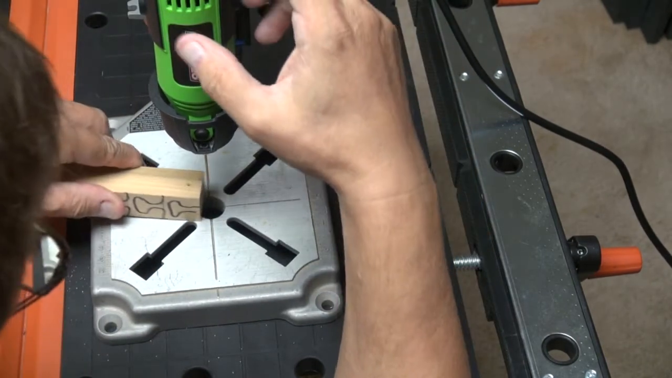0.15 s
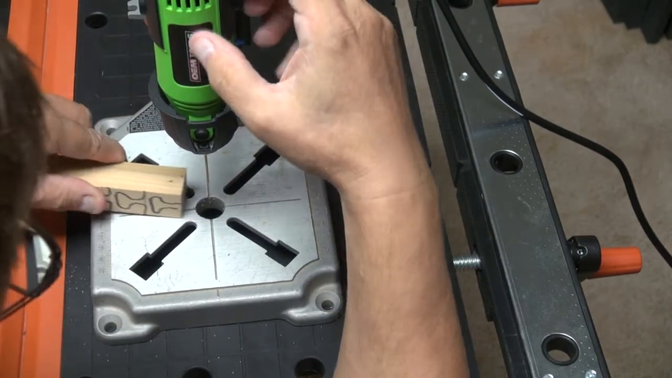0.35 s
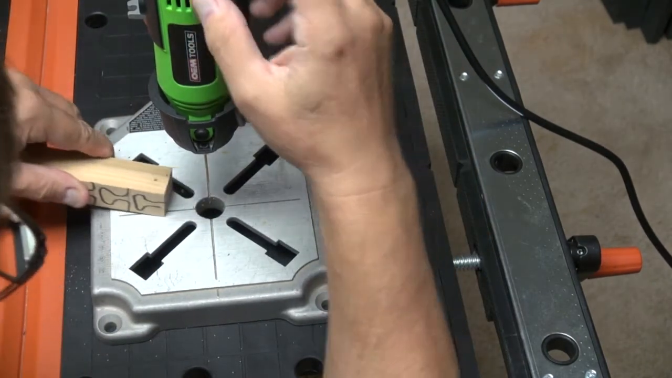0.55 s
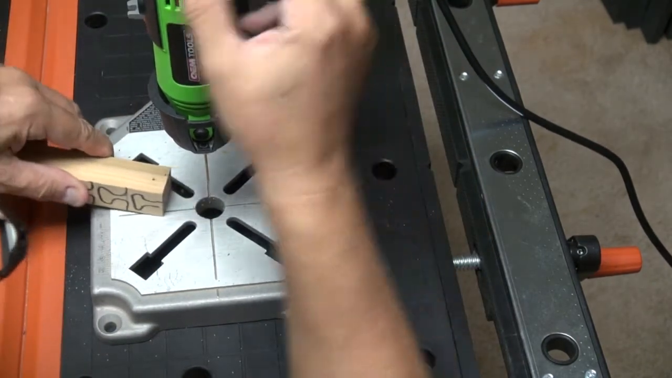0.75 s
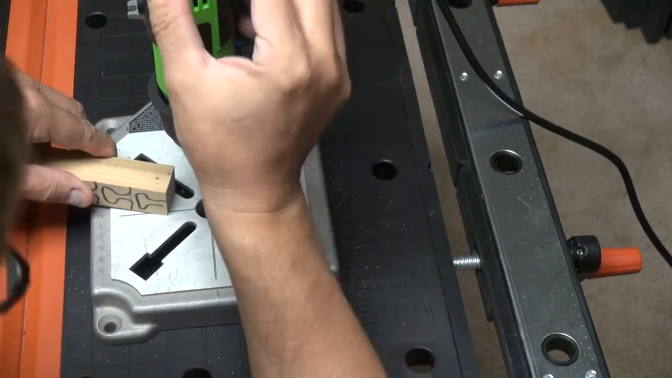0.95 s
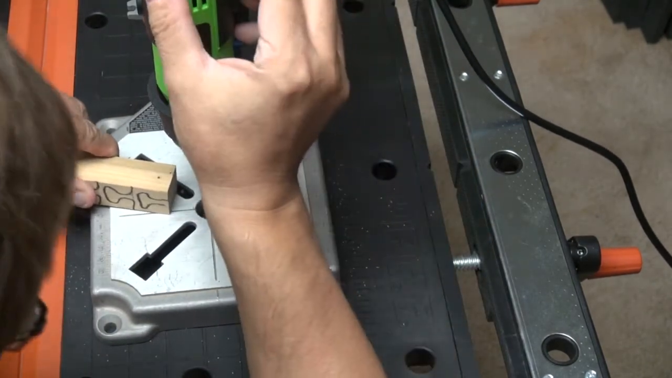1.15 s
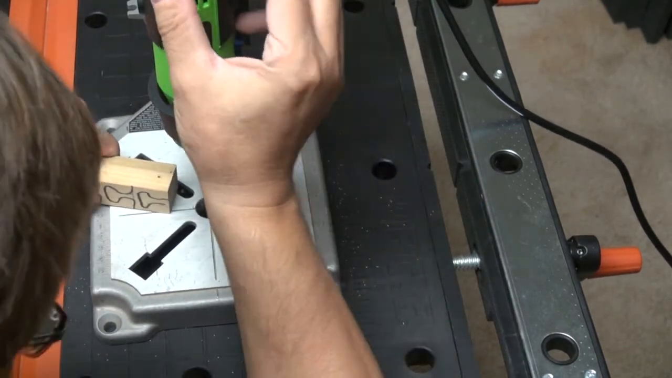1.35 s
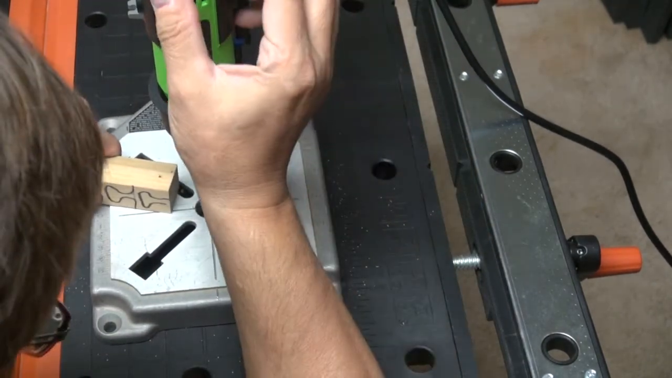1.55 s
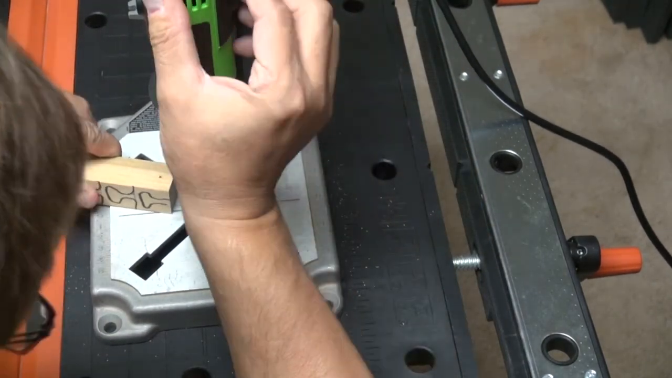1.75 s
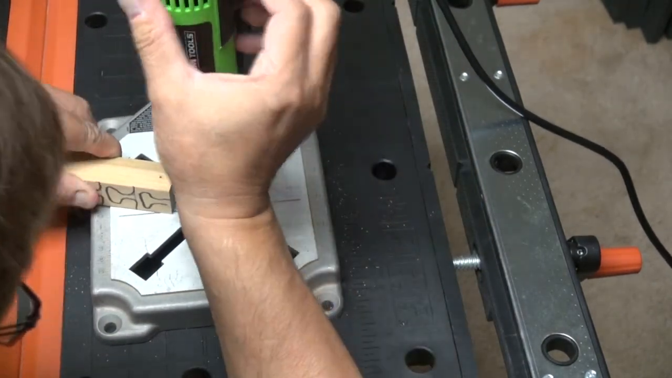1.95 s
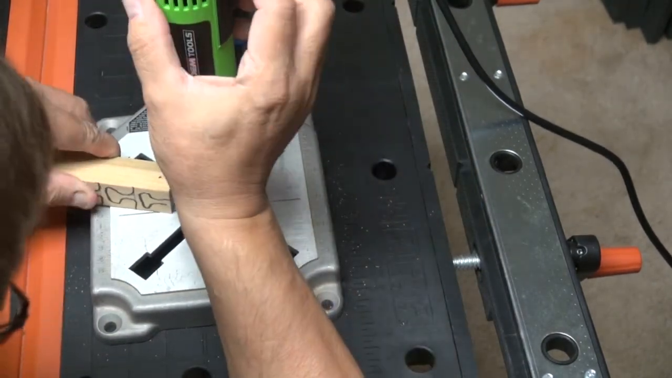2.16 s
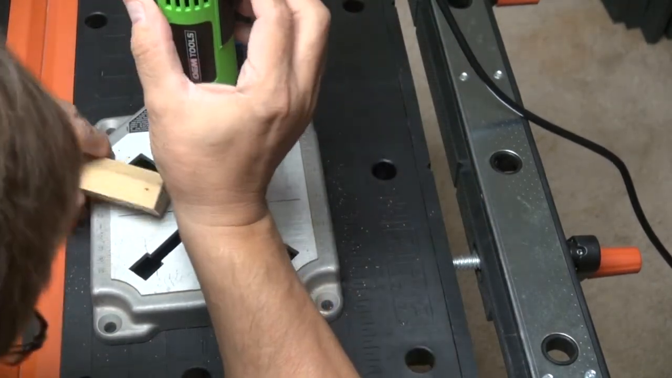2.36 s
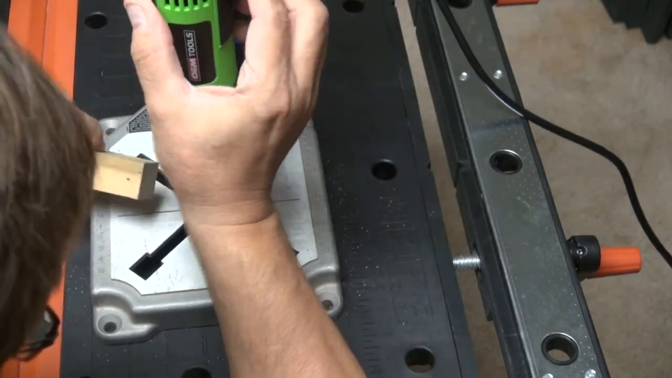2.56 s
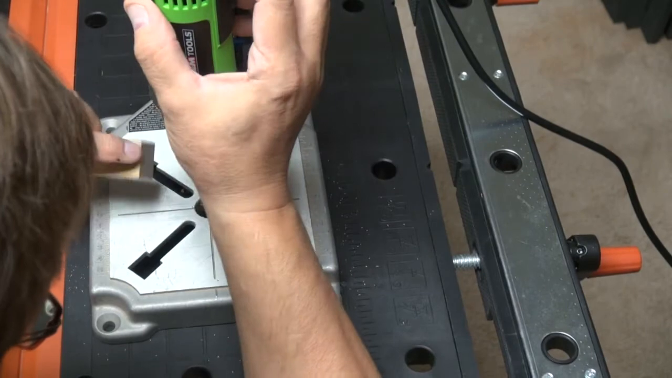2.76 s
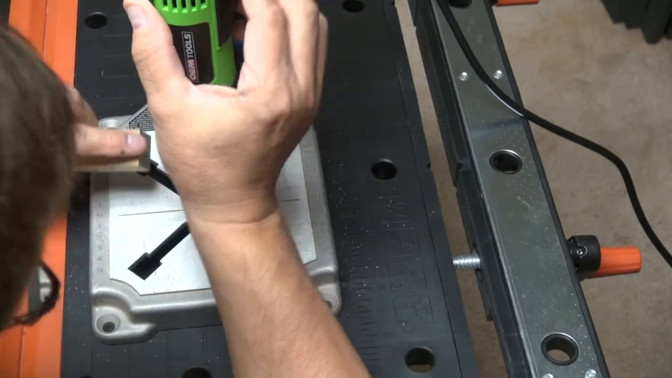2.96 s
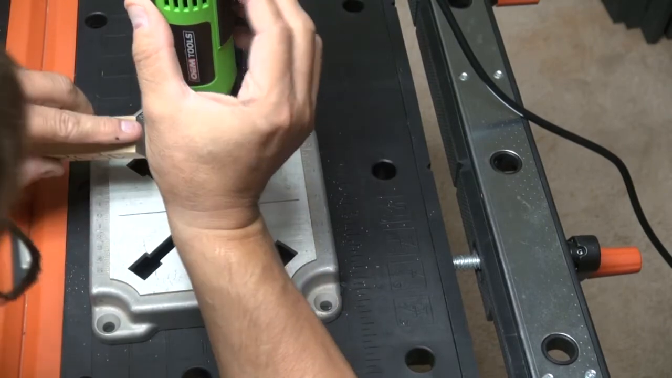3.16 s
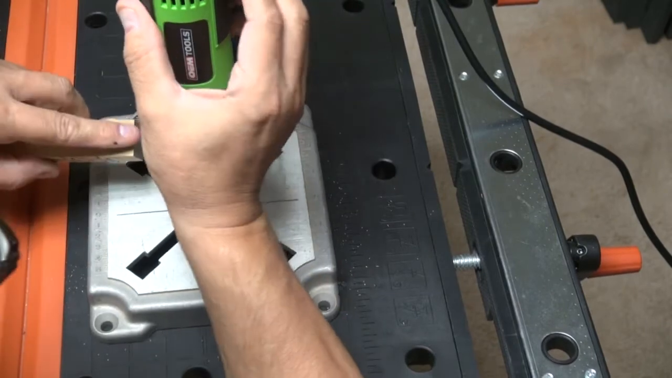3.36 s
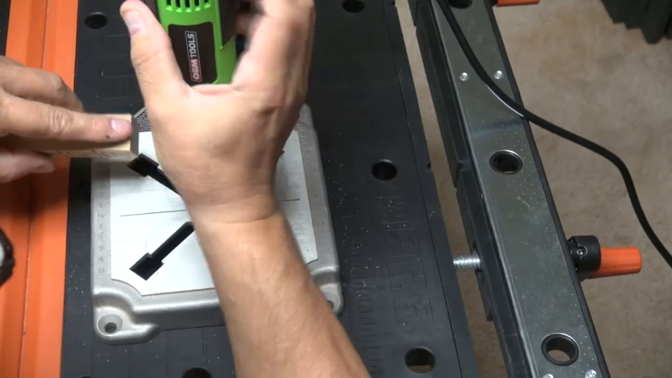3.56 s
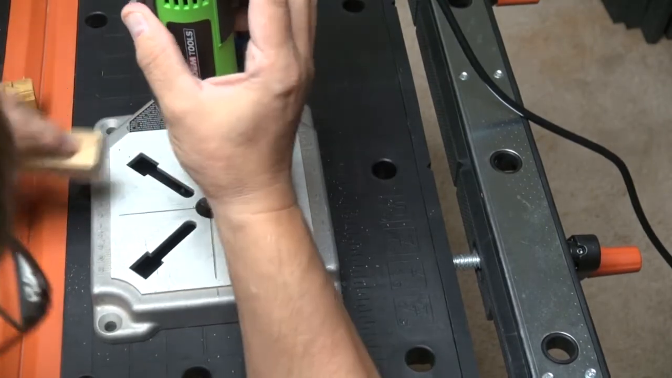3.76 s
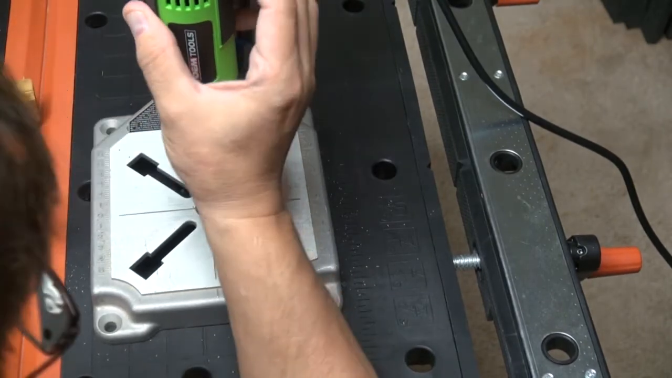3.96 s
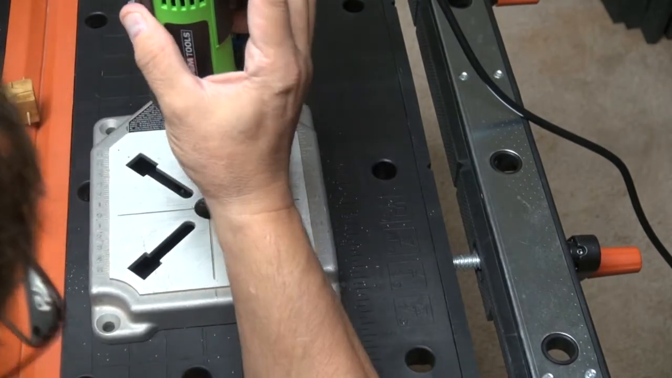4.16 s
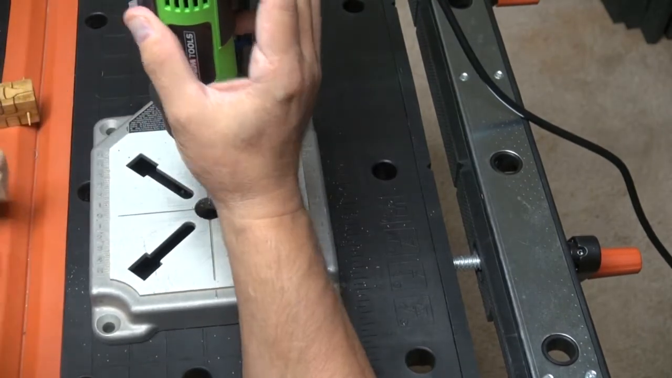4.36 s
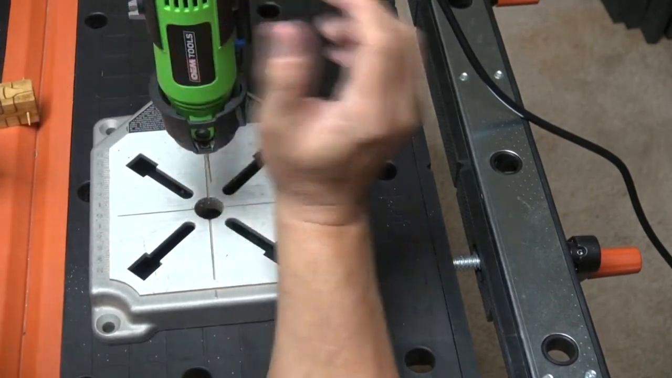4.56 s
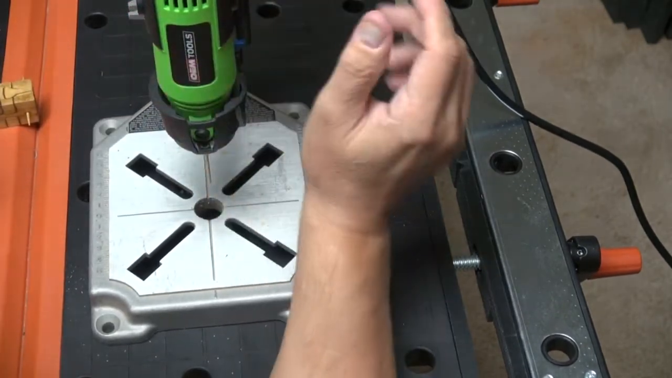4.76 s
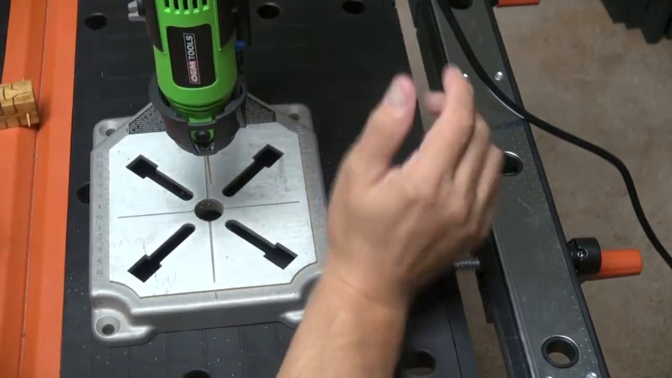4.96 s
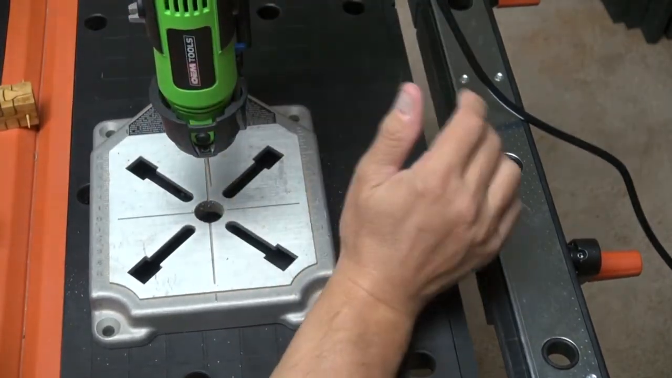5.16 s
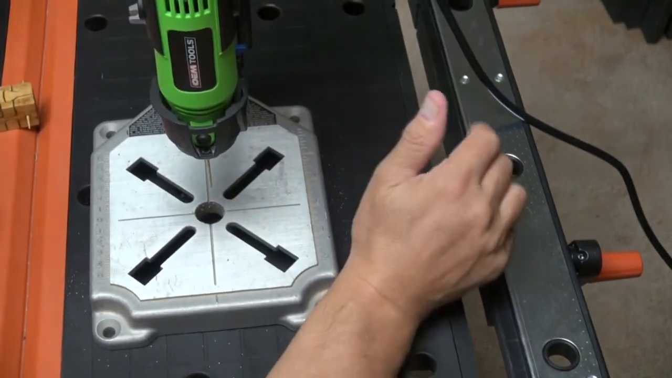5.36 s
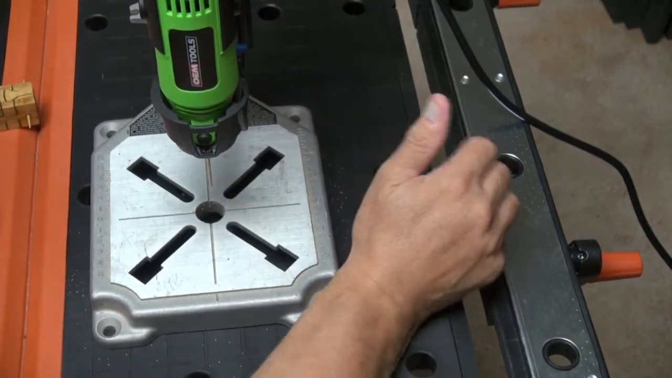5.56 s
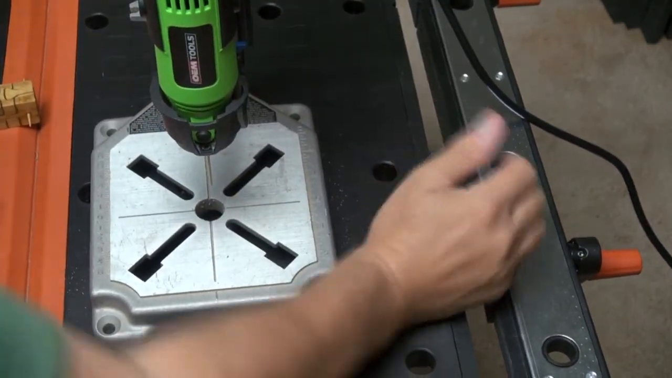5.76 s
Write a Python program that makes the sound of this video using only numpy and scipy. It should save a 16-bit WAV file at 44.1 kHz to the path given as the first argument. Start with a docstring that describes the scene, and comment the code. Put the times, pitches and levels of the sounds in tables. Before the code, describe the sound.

A close stereo pickup, leaning a little left, catches a small electric motor whining at high, nearly constant speed over a wooden block, buzzing and hissing. Power is cut just after four seconds; the pitch falls smoothly as the rotor coasts. Near five seconds come light knocks, then a firmer one and a brief scuff, with a short dry room tail.

```python
"""A small dry workshop: a small rotary tool in a drill stand, close by, a little left of the microphone.
Its shaft whines at about 373 turns a second, sagging a little over a wooden block: partials of one shaft phase.
The motor buzzes with the mains, over hum, fan air and brush hiss; switched off, it coasts in a falling whirr.
Wood knocks on the workbench (ringing modes in a short room tail), and one brief scuff ends the scene."""
import sys
import numpy as np
from scipy import signal
from scipy.fft import rfft, irfft, next_fast_len
from scipy.io import wavfile
from scipy.ndimage import uniform_filter1d, map_coordinates

SR = 44100
rng = np.random.default_rng(int(sys.argv[2]) if len(sys.argv) > 2 else 0)


def file_out(sig):
    """Save sig as 16-bit WAV at sys.argv[1]."""
    # one column per channel
    cols = np.atleast_2d(sig).T
    # limit, then scale
    lim = np.clip(cols, -1, 1)
    pcm = np.round(lim * 32767).astype(np.int16)
    wavfile.write(sys.argv[1], SR, pcm)


N = 256651
OFF_S, MAINS_HZ, TOP_HZ = 4.138, 60, 15750  # switch-off time, mains frequency, top of the band
FULL_SPEED = 373  # reference shaft speed, turns per s


def amp(db):
    """Decibels to gain."""
    return 10 ** (np.asarray(db) / 20)


def unit(x):
    """Scale to rms 1."""
    return x / np.sqrt(np.mean(x ** 2) + 1e-20)


def along(points, position):
    """Read (position, value) points on a logarithmic position axis."""
    where, value = np.transpose(points)
    return np.interp(np.log(position + 1e-3), np.log(where), value)


def curves(rows):
    """One value per sample for each column after the time."""
    s, *columns = np.transpose(rows)
    t = np.arange(N) / SR
    return [np.interp(t, s, column) for column in columns]


def wobble(rate):
    """A smooth random curve, rate knots a second."""
    at = np.linspace(0, N, 4096)
    knots = rng.standard_normal(4096)
    curve = map_coordinates(knots, [at * rate / SR], mode="wrap")
    return np.interp(np.arange(N), at, curve)


def bell(x, centre, width):
    """A smooth bump of height 1."""
    return np.exp(-.5 * ((x - centre) / width) ** 2)


def filtered(x, response):
    """Multiply the spectrum of x by a response of frequency."""
    m = next_fast_len(N + SR // 2)
    hz = np.fft.rfftfreq(m, 1 / SR)
    return irfft(rfft(x, m) * response(hz), m)[..., :N]


def noise(spectrum):
    """Coloured noise of rms 1."""
    white = rng.standard_normal(N)
    return unit(filtered(white, lambda hz: amp(along(spectrum, hz))))


def tone(phase):
    """A sine of rms 1 with a random start."""
    return np.sqrt(2) * np.sin(phase + rng.uniform(0, 2 * np.pi))


def rippled(x, depth_db, spacing_hz):
    """Many close resonances of the housing lift and notch the spectrum."""
    ripple_db = depth_db * rng.standard_normal(400)
    return filtered(x, lambda hz: amp(map_coordinates(ripple_db, [hz / spacing_hz], mode="wrap")))


def dying(speed, knee_hz, steep):
    """Gain that holds at high shaft speed and falls as a power of it below the knee."""
    return 1 / np.sqrt(1 + (knee_hz / speed) ** (2 * steep))


# Spectrum of the quiet workshop: (frequency [Hz], relative level [dB])
QUIET_SPECTRUM = [(30, -30), (70, -4), (200, -3.5), (550, 10), (1000, 1), (4000, 0), (15000, -28)]


def quiet(level_db=-61.5):
    """The quiet of the workshop around the microphone: steady coloured noise."""
    return amp(level_db) * noise(QUIET_SPECTRUM)


# The shaft under power: (time [s], speed [turns per s])
POWERED_SPEED = [(0, 369.5), (.15, 372), (.35, 374.1), (.95, 374.6), (1.25, 374.2), (1.55, 373.5),
                 (1.7, 373.8), (1.9, 373.4), (2.9, 372.9), (3.35, 372.1), (3.5, 372.8), (3.8, 371.2)]


def shaft_speed(since_off, friction=183, drag_speed=520):
    """Turns per second; once off, friction [turns per s lost each s] and fan drag, equal to it at drag_speed."""
    powered, = curves(POWERED_SPEED)
    return drag_speed * np.tan(np.arctan(powered / drag_speed) - friction / drag_speed * since_off)


# Resonances of the stand that the unbalance shakes: (frequency [Hz], width [Hz], lift [dB])
STAND_RESONANCES = [(362.6, 14.1, 14.5), (305.7, 12.6, 17), (261, 9.5, 13), (180, 9, 12), (149, 12, 13)]


def hum(shaft, speed, surge, power, level_db=-46, db_per_decade=80, sideband=0.068, lower=0.15):
    """Unbalance, once a turn: weaker as the shaft slows, swelling at each resonance of the stand."""
    lift_db = sum(db * bell(speed, hz, width) for hz, width, db in STAND_RESONANCES)
    speed_db = db_per_decade * np.log10(speed / FULL_SPEED)
    gain = amp(level_db + speed_db + lift_db + 0.22 * wobble(2.65))
    sidebands = tone(shaft + surge) + lower * tone(shaft - surge)
    return gain * (tone(shaft) + sideband * power * sidebands)


# Outline of the whine under power: (multiple of the shaft rate [-], relative level [dB])
WHINE_OUTLINE = [(4, -19), (7, -18), (14, -18), (19, -21), (30, -20), (33, -26), (38, -28), (42, -23)]
# Partials that stand above that outline: {multiple of the shaft rate [-]: lift [dB]}
PROUD_PARTIALS = {9: 5, 12: 5, 13: 4, 16: 4, 20: 2, 21: 2, 23: 3, 24: 4, 27: 6, 40: 3}
# Leading partials that swell and fade, before a common trim: (time [s], level [dB])
SECOND_PARTIAL = [(0.0, -66), (0.08, -54.5), (0.8, -54), (1.21, -48), (2.77, -52.5), (3.66, -46),
                  (3.73, -56.5), (4.13, -49.5)]
THIRD_PARTIAL = [(0.0, -51), (0.15, -45.5), (0.52, -42.5), (0.99, -56), (1.13, -45.5), (1.43, -46.5),
                 (1.55, -62), (1.93, -49), (2.0, -38.5), (2.18, -66), (2.48, -42), (2.77, -50), (3.19, -39),
                 (3.34, -51.5), (3.58, -47), (3.92, -55.5), (4.0, -41.5), (4.13, -47.5)]
FIFTH_PARTIAL = [(0.0, -46), (1.4, -45), (2.01, -42.5), (2.17, -45.5), (2.38, -43.5), (3.59, -39.5),
                 (4.13, -42)]
ELEVENTH_PARTIAL = [(0.0, -41), (0.06, -37.5), (0.21, -49.5), (0.9, -40), (1.75, -46), (1.98, -61),
                    (2.07, -48.5), (2.58, -52.5), (4.13, -42)]


def whine(shaft, surge, level_db=-35, leading_db=1.77, follower_db=-6.0, wander_db=1.5,
          throb=0.35, swing=0.43, flutter=0.12):
    """Shaft partials; each torque surge shakes their strength and phase, which gives them mains sidebands."""
    tables = {2: SECOND_PARTIAL, 3: THIRD_PARTIAL, 5: FIFTH_PARTIAL, 11: ELEVENTH_PARTIAL}
    leading = {k: leading_db + curves(rows)[0] for k, rows in tables.items()}
    leading[6] = leading[5] + follower_db  # the sixth swells with the fifth
    out = np.zeros(N)
    for k in range(2, 43):
        if k == 8:
            continue  # the eighth is the buzz
        if k in leading:
            db = leading[k]
        else:
            db = level_db + along(WHINE_OUTLINE, k) + PROUD_PARTIALS.get(k, 0) + wander_db * wobble(3.59)
        strength_lag, phase_lag = rng.uniform(0, 2 * np.pi, 2)
        shake = min(k / 12, 1)
        waver = 1 + (2.5 / k) ** 3  # the lowest partials waver most
        blur = .55 * (k / 30) ** 2 * wobble(70)  # bearing play smears the highest
        strength = 1 + throb * shake * np.cos(surge + strength_lag) + flutter * waver * wobble(35)
        phase = k * shaft + swing * shake * np.sin(surge + phase_lag) + blur
        out += amp(db) * strength * tone(phase)
    return out


# Magnetic buzz of the armature: (time [s], level before trim [dB], centre before kink and limit [Hz])
ARMATURE_BUZZ = [(0.0, -40, 2750), (0.06, -45.5, 3070), (0.18, -37.5, 2970), (0.59, -41.5, 2900),
                 (0.65, -41.5, 3130), (0.84, -46, 2980), (0.87, -38, 3020), (1.08, -36, 3100),
                 (1.45, -38, 2940), (1.7, -35.5, 2810), (2.58, -30, 2860), (2.82, -34, 2850),
                 (3.36, -34.5, 2900), (3.69, -31.5, 2910), (4.13, -35.5, 3000)]


def buzz(shaft, surge, speed, level_db=-1.5, sharp=0.97, chirp=0.81, kink=0.34, slot_count=8):
    """The armature slots sing in a burst on each half wave of the mains, the pitch bending within the burst."""
    db, centre_hz = curves(ARMATURE_BUZZ)
    bend = np.clip((centre_hz - slot_count * speed) / (2 * MAINS_HZ), -2, 2)
    burst = unit(np.exp(sharp * np.cos(surge)))
    sway = bend * np.sin(surge) + chirp * np.cos(surge) + kink * np.sin(3 * surge)
    return amp(db + level_db + 0.29 * wobble(40)) * burst * tone(slot_count * shaft + sway)


# Spectrum of the cooling air: (frequency [Hz], relative level [dB])
AIR_SPECTRUM = [(30, -55), (70, -35), (130, -32.5), (200, -27), (280, -16.5), (450, -12.5), (700, -8),
                (1250, 1), (1700, -3), (3000, -2.5), (4500, -8), (7000, -5.5), (15000, -51)]


def fan(speed, level_db=-43.5, db_per_decade=46):
    """Cooling air, falling with the shaft speed."""
    speed_db = db_per_decade * np.log10(speed / FULL_SPEED)
    return amp(level_db + speed_db + 0.62 * wobble(9.3)) * noise(AIR_SPECTRUM)


# Spectrum of the brush hiss: (frequency [Hz], relative level [dB])
HISS_SPECTRUM = [(1500, -19), (4000, 0), (5500, -4.5), (7500, -3.5), (10500, -1), (13000, -4),
                 (15700, -16.5)]


def brushes(shaft, speed, surge, power, level_db=-47.5, current_db=-0.2, knee_hz=115, steep=0.96,
            per_turn=0.18, per_surge=0.092, dull_hz=6500, recur=0.21):
    """Brushes hiss harder each turn and surge, roughness recurring each turn; slowing dulls and fades them."""
    scrape = unit(np.exp(per_turn * np.cos(shaft) + per_surge * power * np.cos(surge)))
    hiss = rippled(noise(HISS_SPECTRUM), depth_db=1.8, spacing_hz=260)
    turn_ago = map_coordinates(hiss, [np.arange(N) - SR / speed])
    hiss = unit(hiss + recur * turn_ago)
    dull = filtered(hiss, lambda hz: 1 / (1 + (hz / dull_hz) ** 4))
    hiss = dull + np.minimum(speed / 220, 1) * (hiss - dull)
    gain = amp(level_db + current_db * power + 0.31 * wobble(4.8))
    return gain * dying(speed, knee_hz, steep) * scrape * hiss


# Comb of partials of the coasting rotor: (multiple of the shaft rate [-], relative level [dB])
COAST_COMB = [(2, -6), (6, -11), (14, -10), (22, -9), (30, -6), (42, -8), (56, -9), (80, -17)]
# Slot and commutator partials that stand out as it slows:
# (multiple [-], lift [dB], speed where strongest [turns per s], spread [turns per s])
SLOT_PARTIALS = [(2, 7, 335, 50), (3, 11, 345, 16), (8, 12, 215, 75), (11, 14, 360, 7), (13, 12, 340, 18),
                 (16, 10, 280, 70), (20, 7, 260, 40), (21, 8, 200, 30), (32, 12.5, 170, 105),
                 (48, 10, 120, 70), (64, 10, 100, 50)]
# How well the housing radiates them: (frequency [Hz], relative level [dB])
HOUSING_RESPONSE = [(150, -35), (450, -8), (1000, -2), (2200, -5), (3100, -2), (4400, 0), (5500, -2.5),
                    (6300, 2), (7900, -1), (9300, -7), (11000, -1), (12300, -9), (15000, -16)]


def coast(shaft, speed, since_off, level_db=-44.0, knee_hz=125, steep=2.5, rise_s=0.024,
          jolt_db=13.5, jolt_s=0.083, flare_db=4.0):
    """Slots and commutator whirr on without current, loudest just after the cut, through housing resonances."""
    lift_db = {k: db * bell(speed, best, spread) for k, db, best, spread in SLOT_PARTIALS}
    out = np.zeros(N)
    for k in np.arange(2, 81):
        blur = (k / 55) ** 2 * wobble(70) * speed / 200  # bearing play smears the high partials
        db = along(COAST_COMB, k) + lift_db.get(k, 0) + flare_db * wobble(16)
        out += amp(db) * tone(k * shaft + blur)
    out = rippled(out, depth_db=2.2, spacing_hz=130)
    out = filtered(out, lambda hz: amp(along(HOUSING_RESPONSE, hz)))
    local_power = np.abs(uniform_filter1d(out ** 2, size=SR // 8))
    steady = out / np.sqrt(local_power + 1e-12)
    rise = 1 - np.exp(-since_off / rise_s)
    jolt = amp(jolt_db * np.exp(-since_off / jolt_s))
    return amp(level_db) * rise * jolt * dying(speed, knee_hz, steep) * steady


def motor(jitter=0.000296, whine_t60=0.32, buzz_t60=0.095):
    """One shaft drives every layer; the switch cuts the ones that need current."""
    t = np.arange(N) / SR
    since_off = np.maximum(t - OFF_S, 0)
    speed = shaft_speed(since_off) * (1 + jitter * wobble(14))
    shaft = 2 * np.pi * np.cumsum(speed) / SR  # phase of the turning shaft
    surge = 2 * np.pi * 2 * MAINS_HZ * t  # torque surges twice a mains cycle
    power = amp(-60 * since_off / buzz_t60)
    whine_fade = amp(-60 * since_off / whine_t60)
    out = hum(shaft, speed, surge, power)
    out += whine_fade * whine(shaft, surge)
    out += power * buzz(shaft, surge, speed)
    out += fan(speed)
    out += brushes(shaft, speed, surge, power)
    return out + coast(shaft, speed, since_off)


# Decay of the workshop: (frequency [Hz], t60 [s])
ROOM_DECAY = [(200, 0.19), (1200, 0.15), (4000, 0.15), (12000, 0.12)]


def workshop(x, wet_db):
    """Near walls answer after a few milliseconds; the treble dies first."""
    hz, t, z = signal.stft(rng.standard_normal(SR // 2), SR, nperseg=256)
    decay = amp(-60 * t / along(ROOM_DECAY, hz)[:, None])
    tail = signal.istft(z * decay, SR, nperseg=256)[1]
    tail = np.pad(tail / np.linalg.norm(tail), (round(.006 * SR), 0))
    return x + amp(wet_db) * signal.fftconvolve(x, tail)[:len(x)]


def ring(modes, scatter_db, crack, crack_s=0.024):
    """One blow on a set of decaying modes, with a brief contact crack; peak 1."""
    t = np.arange(SR // 2) / SR
    x = np.zeros(len(t))
    for hz, db, t60 in modes:
        x += amp(db + scatter_db * rng.normal() - 60 * t / t60) * np.sin(2 * np.pi * hz * t)
    x += crack * amp(-60 * t / crack_s) * rng.standard_normal(len(t))
    return x / np.abs(x).max()


# Knocks, levels before filters and room: (time [s], bench level [dB], block level [dB], brightness [Hz])
WOOD_KNOCKS = [(4.958, -51, -37, 5900), (5.174, -32, -15.5, 4000), (5.208, -15.5, -41, 1790),
               (5.344, -42, -63, 1200), (5.644, -31, -55, 1200), (5.655, -10.5, -27, 2960)]
# Modes of the workbench: (frequency [Hz], relative level before scatter [dB], t60 [s])
BENCH_MODES = [(309, -13, 0.4), (421, -6, 0.076), (562, -11, 0.051), (683, 10.5, 0.038), (823, 1, 0.068),
               (903, 1.5, 0.076), (1130, 7, 0.014), (1227, 11, 0.041), (1473, 5, 0.042), (1820, -2, 0.033),
               (2110, -19, 0.081), (2510, -3, 0.042), (2870, 1, 0.02), (3950, -28, .04)]
# Modes of the wooden block: (frequency [Hz], relative level before scatter [dB], t60 [s])
BLOCK_MODES = [(850, -10, 0.061), (1075, -10, 0.046), (1330, 3, 0.054), (1356, -7, 0.085),
               (1980, -5.5, 0.024), (2390, -6.5, 0.025), (3240, -3, 0.028)]


def knocks():
    """Each contact rings bench and block; soft contacts are duller."""
    out = np.zeros(N + SR)
    small_parts = signal.butter(4, 270, "high", fs=SR, output="sos")  # they radiate little bass
    for s, bench_db, block_db, bright_hz in WOOD_KNOCKS:
        bench = amp(bench_db) * ring(BENCH_MODES, scatter_db=2.5, crack=1.8)
        block = amp(block_db) * ring(BLOCK_MODES, scatter_db=3, crack=0.75)
        softness = signal.butter(2, min(bright_hz, SR / 4), fs=SR, output="sos")
        blow = signal.sosfilt(softness, bench + block)
        blow = signal.sosfilt(small_parts, blow)
        out[round(s * SR):][:len(blow)] += workshop(blow, wet_db=-4)
    return out[:N]


# A short scuff of wood on the bench: (time [s], level [dB])
SCUFF_LEVEL = [(5.785, -75), (5.79, -50), (5.795, -45), (5.797, -34.5), (5.805, -36), (5.812, -43),
               (5.82, -43)]
# Its resonances: (frequency [Hz], relative level [dB], t60 [s])
SCUFF_RESONANCES = [(630, 0, .09), (1152, -4, .1), (2643, -14, .08), (3316, -20, .06)]


def scuff(soft_hz=4000):
    """Brief, soft friction drives a few wood resonances."""
    t = np.arange(SR // 4) / SR
    rubbing = np.zeros(N)
    for hz, db, t60 in SCUFF_RESONANCES:
        response = amp(-60 * t / t60) * np.cos(2 * np.pi * hz * t)
        driven = signal.fftconvolve(rng.standard_normal(N), response)[:N]
        rubbing += amp(db) * unit(driven)
    rubbing = signal.lfilter(*signal.butter(3, soft_hz, fs=SR), rubbing)
    return amp(curves(SCUFF_LEVEL)[0]) * unit(rubbing)


# Stereo lean at the microphone: (frequency [Hz], left minus right [dB])
STEREO_LEAN = [(60, -1), (200, 3), (380, 3.0), (2380, 3.0), (4400, 2.5), (8120, 2.5), (15000, 0.1)]


def scene():
    """Everything is close together, a little left of the microphone."""
    mono = quiet() + motor() + knocks() + scuff()
    return filtered(mono, lambda hz: amp(np.outer([.5, -.5], along(STEREO_LEAN, hz))))


def record(dry):
    """Nothing is kept at or above the top of the band."""
    return filtered(dry, lambda hz: hz < TOP_HZ)


dry = scene()
out = record(dry)
file_out(out)
```